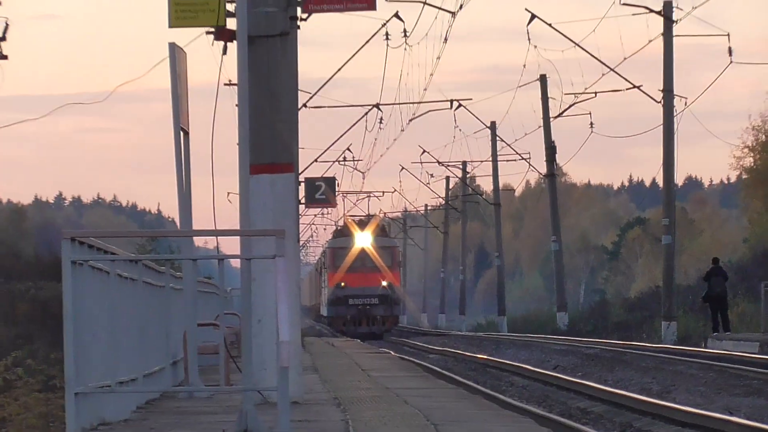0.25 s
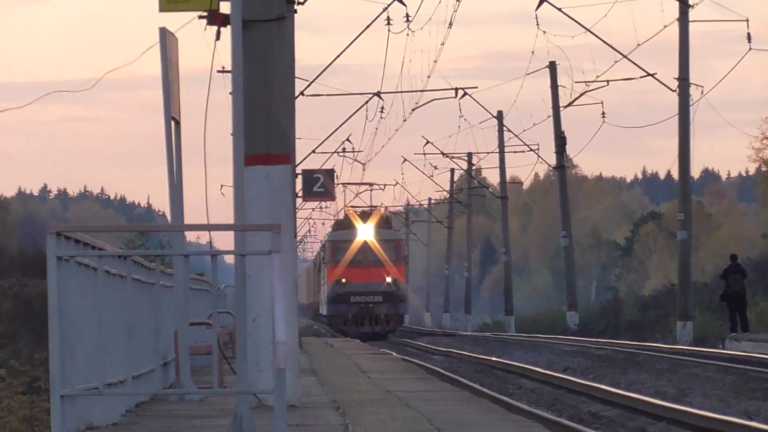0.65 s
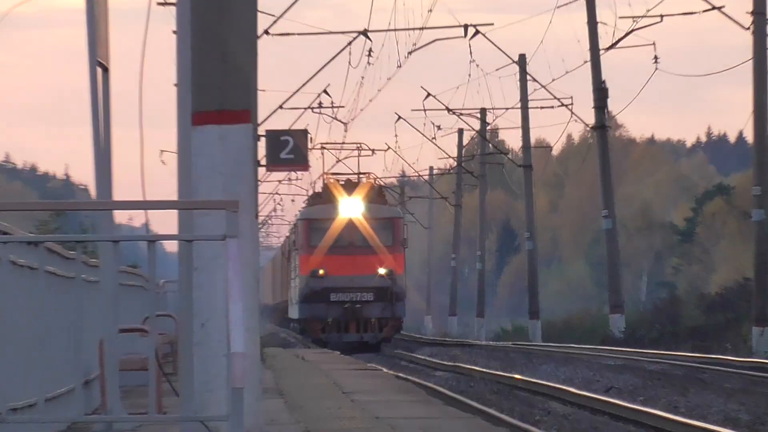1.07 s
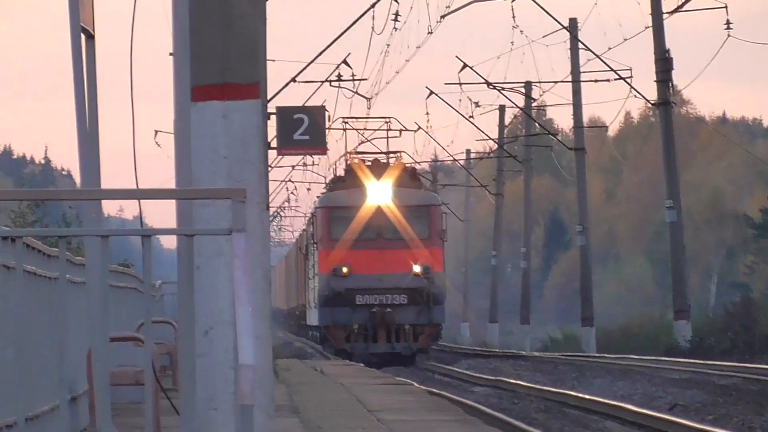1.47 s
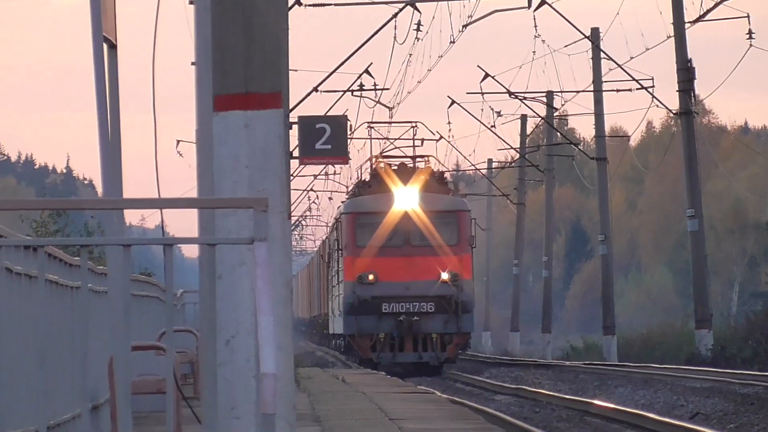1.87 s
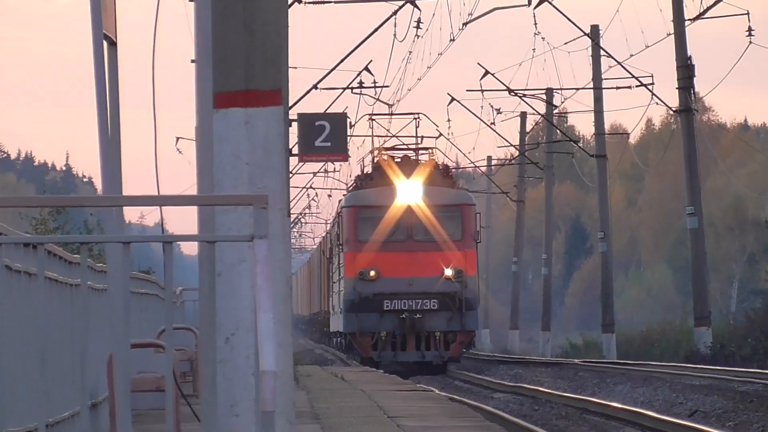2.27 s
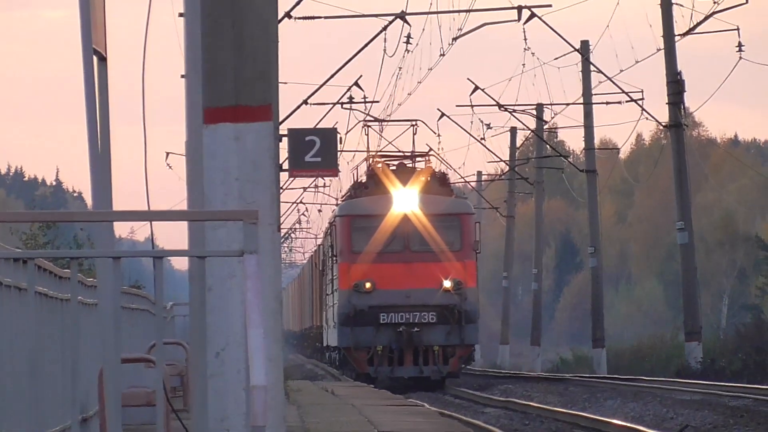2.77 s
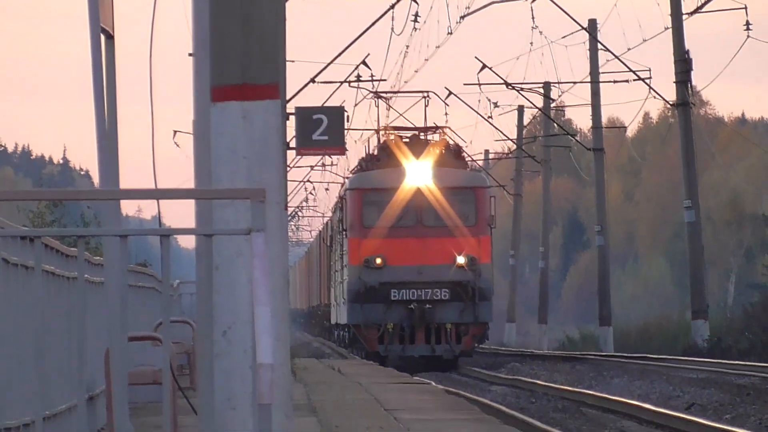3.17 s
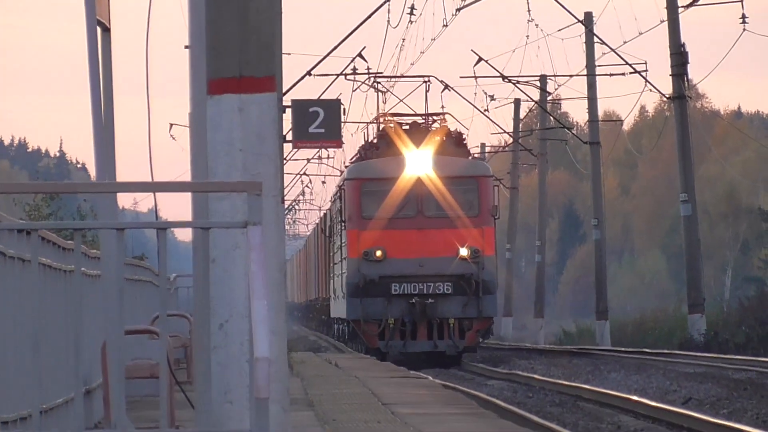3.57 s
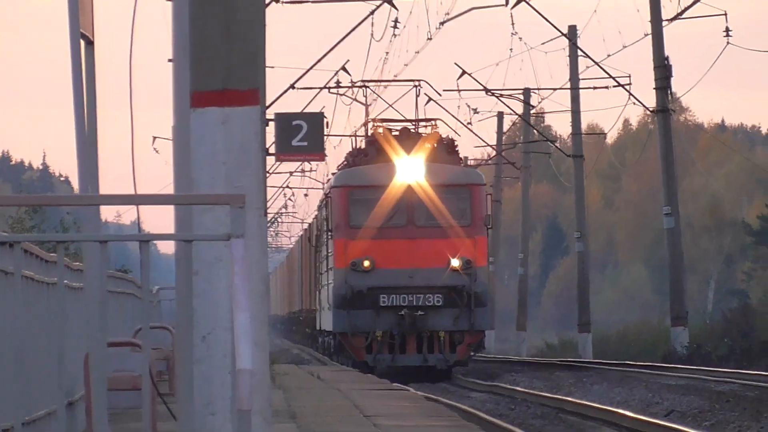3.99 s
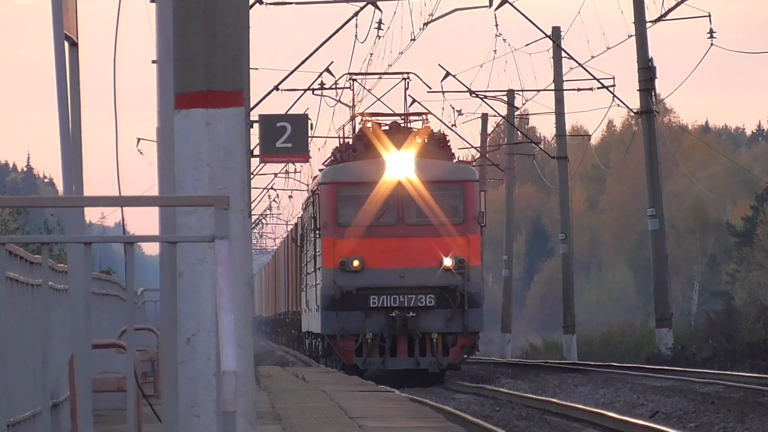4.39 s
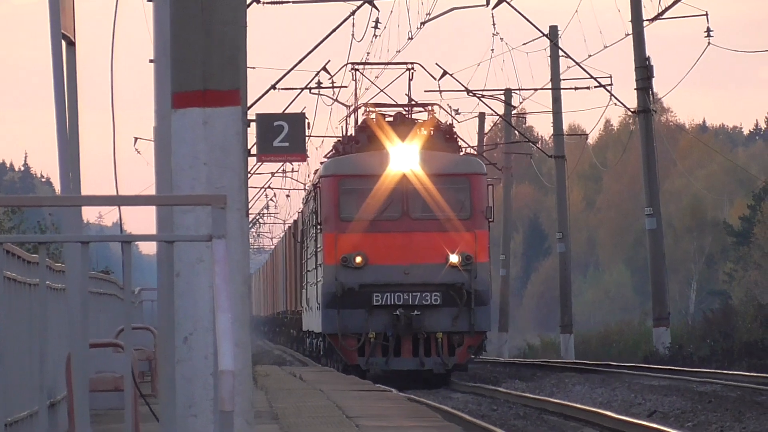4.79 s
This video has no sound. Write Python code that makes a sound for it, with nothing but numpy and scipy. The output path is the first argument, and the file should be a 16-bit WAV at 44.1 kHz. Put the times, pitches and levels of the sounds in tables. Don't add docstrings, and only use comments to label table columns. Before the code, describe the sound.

A five-second mono outdoor take by a railway platform. From the start there is soft, dull rumble of rails and far town, faint hiss, a brief hand rustle until 0.4 s, and the camera's thin high whine with small ticks repeating several times a second. A distant road engine hums low, pulling and gliding in pitch at about 0.3, 1 and 1.7 s, and again later. A dull knock hits the camera body near 0.8 s; the focus motor rubs very high and airy at 0.6, 1.6 and 1.9 s, then under the horn. At 2.15 s a loud, bright, brassy high horn starts slightly sharp with a rough catch, then settles. At 2.5 s a quieter note about an octave lower joins. The held blast shimmers with lowered forest echoes while the background ducks. The high horn shuts near 4.6 s, the low at 4.7 s, and a diffuse echo fades to the end.

```python
import sys
import numpy as np
from scipy import signal
from scipy.io import wavfile

SR = 44100
rng = np.random.default_rng(int(sys.argv[2]) if len(sys.argv) > 2 else 0)


def magnitude_from_level(level_db):
    exponent = np.asarray(level_db, float) / 20
    return 10 ** exponent


def output_pcm(signal):
    pcm = np.clip(np.atleast_2d(signal).T, -1, 1) * 32767
    wavfile.write(sys.argv[1], SR, np.round(pcm).astype(np.int16))


N = 222043
STEP = 64


def unit(x):
    return x / np.sqrt(np.mean(x ** 2) + 1e-20)


def undb(db):
    return np.exp(db * np.log(10) / 20)


def clock():
    return np.arange(N) / SR


def in_time(rows):
    s, value = np.transpose(rows)
    return np.interp(clock(), s, value)


def gate(rows):
    t = clock()
    return (t >= rows[0][0]) & (t <= rows[-1][0])


def poles(hz, r):
    return [1, -2 * r * np.cos(2 * np.pi * hz / SR), r * r]


def filtered(x, order, edges_hz, kind):
    return signal.sosfilt(signal.butter(order, edges_hz, kind, fs=SR, output="sos"), x)


def drift(rate):
    slow = signal.lfilter([1], poles(0, np.exp(-80 * np.pi * rate / SR)), rng.standard_normal(N // 40 + 2002))
    slow = slow[2000:]
    return np.interp(np.arange(N) / 40, np.arange(len(slow)), unit(slow))


def burst(t, start, rise, stop, fall_db_s):
    return np.clip((t - start) / rise, 0, 1) * undb(-fall_db_s * np.maximum(t - stop, 0))


def tone(hz, db):
    turns = np.cumsum(hz + np.zeros(N)) / SR + rng.random()
    return np.sqrt(2) * undb(db) * np.sin(2 * np.pi * turns)


def bands(rows):
    white = rng.standard_normal((2, N))
    out = np.zeros(N)
    for k, (low_hz, high_hz, db) in enumerate(rows):
        out += magnitude_from_level(db) * unit(filtered(white[k % 2], 3, [low_hz, high_hz], "band"))
    return out


def coloured(points, patchy_db):
    hz, db = np.transpose(points)
    white, out = rng.standard_normal((2, N)), np.zeros(N)
    edges = 20 * 2 ** np.arange(0, 9.8, 1 / 3)
    for k, (low, high) in enumerate(zip(edges, edges[1:])):
        if high < hz[0] or low > hz[-1]:
            continue
        level = np.interp(np.log(low * high) / 2, np.log(hz), db)
        out += filtered(white[k % 2], 2, [low, high], "band") * undb(level + patchy_db * drift(3.8))
    return unit(out)


# time in seconds, gain in dB.
GAIN = [
    (0, 1),
    (2.17, 0),
    (2.3, -3),
    (2.6, -3.5),
    (4.6, -4.5),
    (5.03, 1.5),
]


def recorder_gain_db():
    return in_time(GAIN)


# frequency in Hz, density in dB per Hz.
RUMBLE = [(22, -16), (90, -9), (170, 2), (260, -7.5), (330, -7.5), (490, -4), (640, -15), (1250, -17),
          (1700, -31), (3000, -32), (4300, -45.5), (5500, -57.5), (7500, -47), (11500, -49), (15700, -66.5)]


def background():
    return magnitude_from_level(-41) * coloured(RUMBLE, patchy_db=1.5)


# low edge in Hz, high edge in Hz, level in dB rms.
CAMERA_HISS = [(7800, 9900, -73.5), (12500, 13000, -80), (12800, 15800, -71)]
# time in seconds, level in dB.
RUSTLE = [
    (0, -75),
    (.1, -74),
    (.18, -70),
    (.3, -77),
    (.36, -90),
]


def camera_hiss():
    return bands(CAMERA_HISS) + magnitude_from_level(in_time(RUSTLE)) * gate(RUSTLE) * bands([(4370, 7000, 0)])


CYCLE_S = .2831
# frequency in Hz, level in dB rms.
WHINES = [(3365, -54), (4221, -63), (6761, -69), (7623, -75), (9367, -69.5), (9701, -76)]
# whine number, time into the turn in seconds, half width in seconds, depth in dB.
SAGS = [(0, .12, .05, -4), (0, .245, .012, -3), (1, .055, .022, -9), (1, .105, .01, -5), (1, .14, .06, -3),
        (2, .043, .012, -16), (2, .1, .008, -4), (2, .17, .04, -3), (4, .043, .012, -16),
        (4, .165, .02, -14), (4, .232, .007, -8), (4, .272, .007, -8), (5, .043, .014, -10),
        (5, .165, .022, -8), (5, .25, .04, -4)]
# time into the turn in seconds, level in dB.
TICKS = [(.0144, -53), (.031, -59), (.062, -63), (.0942, -53), (.128, -63), (.1455, -58), (.164, -60),
         (.1955, -57), (.2463, -52.5)]
# frequency in Hz, level in dB, 60 dB decay time in seconds.
TICK_MODES = [
    (2600, 0, .035),
    (8380, -11, .018),
]


def camera_loop():
    into = np.arange(round(CYCLE_S * SR)) / SR
    out = np.zeros(N)
    for k, (hz, db) in enumerate(WHINES):
        mine = [row[1:] for row in SAGS if round(row[0]) == k]
        sag = sum((depth * np.exp(-((into - s) / half) ** 4) for s, half, depth in mine), np.zeros(len(into)))
        out += tone(hz * (1 + 0.00059 * drift(18)), db + np.resize(sag, N) + 1.2 * drift(22))
    clicks = np.zeros(N + SR) + 1e-18
    for start in np.arange(0, N / SR, CYCLE_S):
        for (s, db), chance in zip(TICKS, rng.normal(0, .8, len(TICKS))):
            clicks[round((start + s) * SR)] = magnitude_from_level(db + chance)
    for hz, db, t60 in TICK_MODES:
        push = [0, np.sin(2 * np.pi * hz / SR)]
        out += magnitude_from_level(db + 4) * signal.lfilter(push, poles(hz, magnitude_from_level(-60 / (t60 * SR))), clicks[:N])
    return out


# start in seconds, length in seconds, first and last firing rate in Hz, peak in dB.
PULLS = [
    (.25, .42, 98, 106, -46),
    (.95, .72, 86, 105, -45),
    (1.72, 1.0, 50, 76, -54),
    (2.75, 1.6, 76, 117, -48),
    (4.5, .9, 111, 82, -43),
]
PULL_PEAK, PULL_EDGE_DB = .65, 14


def engine():
    t, out = clock(), np.zeros(N)
    for start, length, first_hz, last_hz, db in PULLS:
        share = np.clip((t - start) / length, 0, 1)
        before, beyond = 1 - share / PULL_PEAK, (share - PULL_PEAK) / (1 - PULL_PEAK)
        away = np.where(share < PULL_PEAK, before, beyond)
        pull = tone(first_hz + (last_hz - first_hz) * share, db - PULL_EDGE_DB * away ** 2)
        out += pull * np.sqrt(1 - away ** 8)
    return out


# start in seconds, run in seconds, level in dB, coasting fall in dB per second.
FOCUS = [
    (.629, .025, -58, 190),
    (1.636, .222, -53, 1200),
    (1.942, .03, -52, 140),
    (2.877, .04, -60, 700),
    (2.95, .335, -55, 250),
    (3.462, .022, -67, 1000),
    (4.069, .285, -55, 350),
]
# frequency in Hz, bandwidth in Hz, level in dB.
FOCUS_PEAKS = [(12800, 120, 0), (13350, 90, 1), (14150, 80, 1), (14600, 90, 1), (14900, 100, 2),
               (15400, 200, 0)]


def focus():
    white = rng.standard_normal(N) * undb(1.5 * drift(60))
    out = magnitude_from_level(-5) * filtered(white[::-1], 4, 12500, "high")
    for k, (hz, width, db) in enumerate(FOCUS_PEAKS):
        r = np.exp(-np.pi * width / SR)
        ringing = signal.lfilter([(1 - r * r) / 2, 0, (r * r - 1) / 2], poles(hz, r), white)
        out += (-1) ** k * magnitude_from_level(db) * ringing
    out = unit(filtered(out, 8, 12250, "high"))
    out += tone(9720, -17 + 2.8 * drift(20))
    t, rise_s = clock(), .018
    return out * sum(magnitude_from_level(db) * burst(t, s, rise_s, s + run, fall) for s, run, db, fall in FOCUS)


# time in seconds, level in dB, low edge in Hz, high edge in Hz.
KNOCKS = [
    (.778, -50, 2500, 5470),
    (1.198, -76, 4860, 9000),
    (3.371, -55, 9500, 12200),
]


def knocks():
    out = np.zeros(N)
    for s, db, low_hz, high_hz in KNOCKS:
        click = np.zeros(N) + 1e-18
        click[round(s * SR)] = magnitude_from_level(db + 19)
        out += filtered(click, 2, [low_hz, high_hz], "band")
    return out


# time in seconds, level in dB.
HIGH_AIR = [
    (2.151, -60.5),
    (2.182, 12),
    (2.218, -3),
    (4.56, -1.5),
    (4.6, -16),
    (4.66, -52),
]


def high_air():
    return magnitude_from_level(in_time(HIGH_AIR)) * gate(HIGH_AIR)


HIGH_HZ, OVERSHOOT_HZ, SETTLE_S = 797.03, 14, .07


def high_pitch():
    return HIGH_HZ + OVERSHOOT_HZ * np.exp(-np.maximum(clock() - 2.15, 0) / SETTLE_S)


def stack(pitch, orders):
    return sum(tone(k * pitch, db - orders[0][1]) for k, db in orders)


HIGH_DB = [0, -10.5, -15, -9, -23, -24.5, -32.5, -34.5, -37, -38.5, -44.5, -46.5, -58, -60.5]
LOW_DB = [-1.5, -3.5, -5.5, -18, -27, -22]
HIGH_ORDERS, LOW_ORDERS = list(enumerate(HIGH_DB, 1)), list(enumerate(LOW_DB, 1))
HIGH_STRAIGHT = {1: -26.6, 2: -35.9, 3: -44.7, 4: -36.8, 5: -56.2}
LOW_STRAIGHT = {1: -43.6, 3: -64}
# harmonic number, offset in Hz,
# time in step with the straight path in seconds, level against it in dB.
HIGH_PATHS = [(1, 0.2, 5.764, -5.1), (1, -0.26, 4.631, -3.8), (1, -1.18, 3.724, -5.6),
              (1, -1.54, 3.392, -5.8), (1, -2.3, 3.537, -7.9), (1, -3.35, 3.618, -13.9),
              (1, -3.91, 3.472, -7.6), (1, -5.14, 3.547, -11.0), (1, -5.8, 3.503, -15.5),
              (2, 0.6, 4.199, -12.1), (2, -0.43, 3.887, -6.1), (2, -1.82, 3.466, -11.8),
              (2, -2.7, 3.65, -10.8), (2, -3.7, 3.626, -12.2), (2, -4.87, 3.553, -16.5),
              (2, -5.6, 3.477, -14.9), (2, -7.55, 3.537, -14.3), (3, 0.9, 3.028, -5.2),
              (3, 0.2, 2.404, -1.9), (3, -0.78, 3.349, -8.2), (3, -1.91, 3.473, -6.6),
              (3, -2.6, 3.558, -8.9), (3, -3.08, 3.635, -6.6), (4, 0.7, 3.679, -13.9),
              (4, -0.6, 3.103, -15.5), (4, -1.45, 3.825, -18.0), (5, 0.71, 3.294, -3.9),
              (5, -0.29, 2.699, -0.7), (5, -2.29, 3.669, -12.5), (5, -3.08, 3.653, -9.6)]
LOW_PATHS = [(1, 0.85, 3.65, -9.0), (1, 0.21, 2.42, 5.1), (1, -0.55, 3.131, -9.3), (1, -0.9, 3.958, -8.0),
             (1, -2.1, 3.679, -0.3), (1, -2.25, 3.462, 2.0), (1, -4.77, 3.516, -6.2),
             (3, -3.52, 3.393, 9.0), (3, -3.85, 3.381, 4.4), (3, -7.11, 3.538, 13.4),
             (3, -7.79, 3.445, 15.8), (3, -8.7, 3.512, 14.1), (3, -9.21, 3.507, 15.3),
             (3, -10.0, 3.493, 8.1)]
HIGH_OPEN_S, VALVE_SHUT_S = 2.157, 4.58
LOW_HZ, LOW_OPEN_S, LOW_SHUT_S = 393.9, 2.5, 4.7
ATTACK_S, BLOOM_S = .024, .02
PUNCH, PUNCH_S = .8, .016
FASTEST_FALL = 6.5
FLICKER_DB, FLICKER_PER_S = -17.5, 11


def eddies(count):
    r = np.exp(-2 * np.pi * FLICKER_PER_S * STEP / SR)
    slow = signal.lfilter([1], poles(0, r), rng.standard_normal((2, count + 300)))
    return [1, 1j] @ unit(slow[:, 300:])


def direct(pitch, orders, straight, paths, opens, shuts, lag_s_hz, fall_db_s, beam,
           stray_hz, stray_db, clearing_db):
    skip = 2 * SR
    t, fine = np.arange(skip, N, STEP) / SR, np.arange(skip, N) / SR
    turns = np.cumsum(pitch + np.zeros(N))[skip:] / SR
    out = np.zeros(N)
    for k, db in orders:
        strays = [(k, stray_hz * (u - .7), 3 + w, stray_db) for u, w in rng.random((4, 2))]
        mine = [row for row in paths if round(row[0]) == k] or strays
        late = opens + BLOOM_S * (k > 1)
        fall = fall_db_s * min(k ** beam, FASTEST_FALL)

        def valve(hz):
            return burst(t - abs(hz) * lag_s_hz / k ** beam, late, ATTACK_S, shuts, fall)

        flicker = magnitude_from_level(FLICKER_DB) * (k > 1) * np.sqrt(k / 4) * eddies(len(t))
        punch = PUNCH / k * np.exp(-np.maximum(t - late - ATTACK_S, 0) / PUNCH_S)
        path = valve(0) * (1 + flicker + punch)
        for _, hz, s, level in mine:
            path = path + magnitude_from_level(level) * valve(hz) * np.exp(2j * np.pi * hz * (t - s))
        path = path * magnitude_from_level(straight.get(k, db + max(k - 6, 0) * clearing_db * (t - 3.7)))
        turn = 2 * np.pi * (k * turns + rng.random())
        out[skip:] += np.interp(fine, t, path.real) * np.cos(turn)
        out[skip:] -= np.interp(fine, t, path.imag) * np.sin(turn)
    return np.sqrt(2) * out


def direct_horns():
    high = direct(high_pitch(), [(k, db - 29.0) for k, db in HIGH_ORDERS], HIGH_STRAIGHT, HIGH_PATHS,
                  HIGH_OPEN_S, VALVE_SHUT_S, lag_s_hz=.015, fall_db_s=48, beam=2.0,
                  stray_hz=5.0, stray_db=-15, clearing_db=1.1)
    low = direct(LOW_HZ, [(k, db - 44.0) for k, db in LOW_ORDERS], LOW_STRAIGHT, LOW_PATHS,
                 LOW_OPEN_S, LOW_SHUT_S, lag_s_hz=.013, fall_db_s=21, beam=0,
                 stray_hz=14.0, stray_db=1.5, clearing_db=0)
    return high + low


# frequency in Hz, density in dB per Hz.
AIR_HISS = [(300, -13), (600, -4), (1000, 4), (1700, -8.5), (2600, -9), (3700, -5), (4800, -23.5),
            (5600, -21), (9000, -33.5)]
# low edge in Hz, high edge in Hz, level in dB rms.
SMEARS = [(770, 895, -57), (1765, 1800, -64.5), (1947, 2100, -60), (2370, 2385, -51.5), (2340, 2750, -65.5),
          (3130, 3180, -57.5), (3240, 3600, -57.5), (3940, 3978, -63), (4370, 4770, -65.5)]


def rushing_air(air):
    keep = magnitude_from_level(-40 / SR)
    linger = signal.lfilter([1 - keep], [1, -keep], air)
    return (0.23 * air + 1.23 * linger) * (magnitude_from_level(-54) * coloured(AIR_HISS, patchy_db=0.0) + bands(SMEARS))


# order as a multiple of the pitch, level in dB.
CATCH_ORDERS = [(.5, 2), (1.5, -3.5), (2.5, 1), (3.5, -6.5), (4.5, -5), (5.5, -6), (6.5, -22), (7.5, -29),
                (8.5, -25)]


def diaphragm_catch():
    start, rise = 2.168, .027
    envelope = burst(clock(), start, rise, start + rise, fall_db_s=360)
    return magnitude_from_level(-39.5) * envelope * stack(high_pitch(), CATCH_ORDERS)


# pitch ratio, delay in seconds, level in dB.
FRONT = [
    (1.101, .05, -20),
    (1.112, .08, -31),
    (1.127, .06, -31),
]


def train_front(air):
    t, pitch = clock(), high_pitch()
    out = np.zeros(N)
    for ratio, delay, db in FRONT:
        out += np.interp(t - delay, t, air) * tone(ratio * pitch, db + 2.5 * drift(4))
    return out * magnitude_from_level(5.8 * (t - HIGH_AIR[0][0] - 2.0))


SIDEWAYS = list(enumerate([0.5, -12.5, -24.5, -37.5], 1))
# time in seconds, level in dB.
LOW_AIR = [
    (2.47, -68),
    (2.54, -7),
    (2.62, -4),
    (4.65, -1.5),
    (4.75, -6),
    (5.03, -8),
]
# cosine of angle off the heading, level in dB.
SCATTER = [(-1.0, 4.5), (-0.9, 2), (-0.4, 5), (0.1, 5), (0.52, 5.5), (0.78, -1), (0.9, -14)]
SPEED, START_M, SOUND = 22.0, 130, 340
SIZE_SPREAD_DB = 5.5
FOREST_EDGE_M, EDGE_SHARE = 30, .4


def sideways_horns(air):
    low_air = magnitude_from_level(in_time(LOW_AIR)) * (clock() >= LOW_AIR[0][0])
    high = magnitude_from_level(-28) * air * stack(high_pitch(), SIDEWAYS)
    return high + magnitude_from_level(-33.5) * low_air * stack(LOW_HZ, LOW_ORDERS)


def trackside(horns, fade_db_s, count):
    sent = np.linspace(-.1, 3.4, 60)
    train = SPEED * sent - START_M
    step, skip = clock(), 2 * SR
    t = step[skip::4]
    first = HIGH_AIR[0][0] - START_M / SOUND
    heard = first + sent - train / SOUND
    out = np.zeros(len(t))
    sizes = unit(magnitude_from_level(SIZE_SPREAD_DB * rng.standard_normal(count)))
    for (u, w), size in zip(rng.random((count, 2)), sizes):
        x, y = -320 + 400 * u, 14 + 110 * w ** 1.3
        y = FOREST_EDGE_M + 10 * w if w < EDGE_SHARE else y
        way = np.hypot(x - train, y)
        back = first + sent + (way + np.hypot(x, y)) / SOUND
        db = np.interp((x - train) / way, *np.transpose(SCATTER)) - fade_db_s * (back - heard)
        delayed = np.interp(np.interp(t, back, heard), step, horns)
        out += np.interp(t, back, size * magnitude_from_level(db)) * delayed
    return np.r_[np.zeros(skip), signal.resample_poly(out, 4, 1)][:N] / np.sqrt(count)


def afterglow(fade_db_s):
    pitch, since = high_pitch(), np.maximum(clock() - VALVE_SHUT_S, 0)
    glow = sum(tone(k * pitch, db - fade_db_s * since + 5.0 * drift(22)) for k, db in HIGH_ORDERS[1:9])
    return glow * np.minimum(since / 0.026, 1)


def horns():
    air = high_air()
    near = direct_horns() + diaphragm_catch() + rushing_air(air)
    echoes = trackside(sideways_horns(air), fade_db_s=11.0, count=150)
    echoes *= magnitude_from_level(recorder_gain_db() + 4.5)
    return near + magnitude_from_level(-22) * train_front(air) + echoes + magnitude_from_level(-38.5) * afterglow(fade_db_s=90)


def scene():
    beds = magnitude_from_level(recorder_gain_db()) * (background() + camera_hiss() + camera_loop())
    return (beds + engine() + focus() + knocks() + horns())[None]


def roll_off(x):
    return signal.sosfilt(signal.butter(12, 15840, fs=SR, output="sos"), x)


def record(dry):
    return roll_off(dry)


dry = scene()
out = record(dry)
output_pcm(out)
```